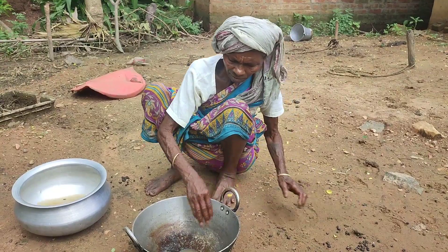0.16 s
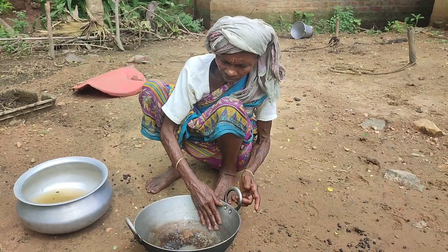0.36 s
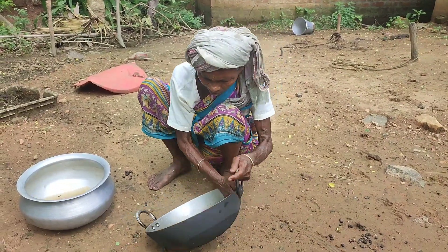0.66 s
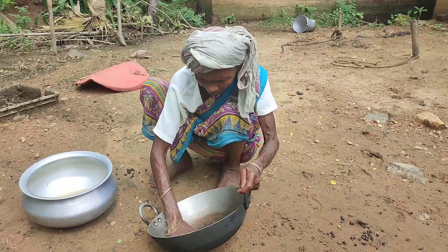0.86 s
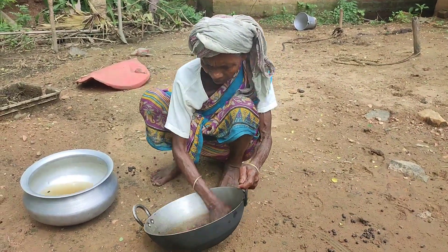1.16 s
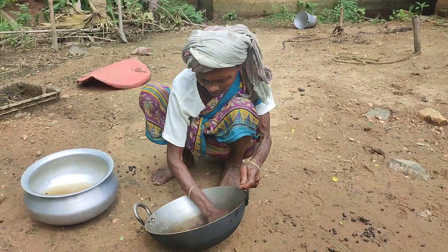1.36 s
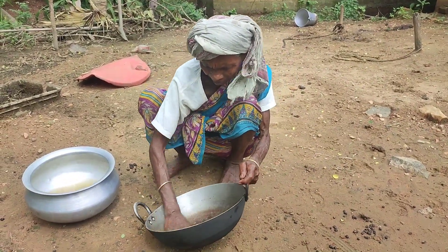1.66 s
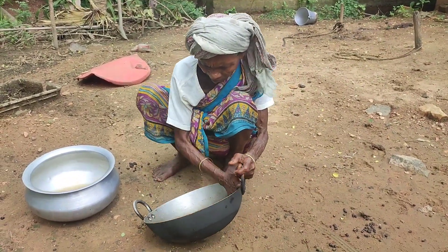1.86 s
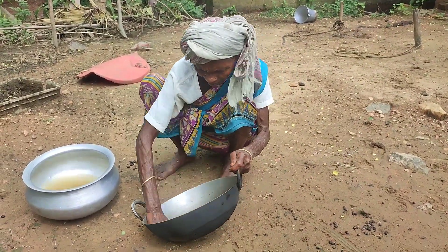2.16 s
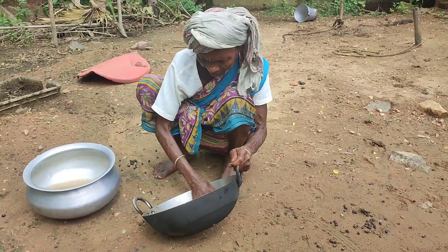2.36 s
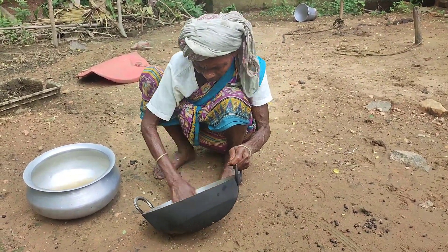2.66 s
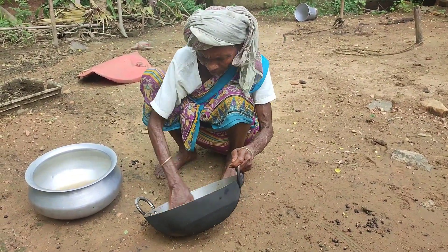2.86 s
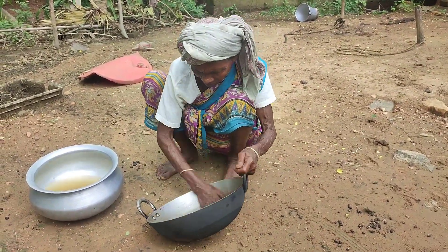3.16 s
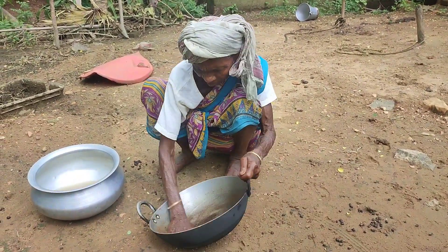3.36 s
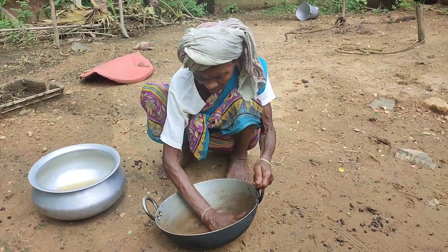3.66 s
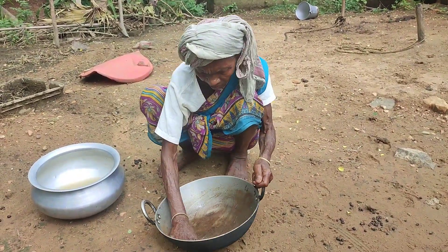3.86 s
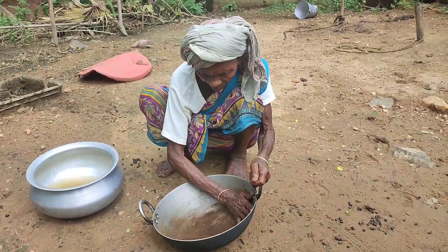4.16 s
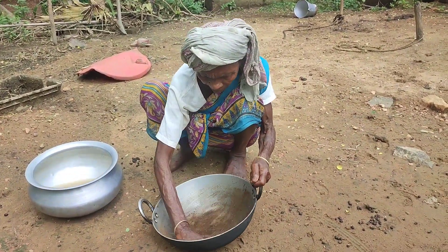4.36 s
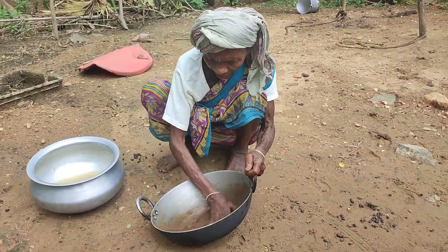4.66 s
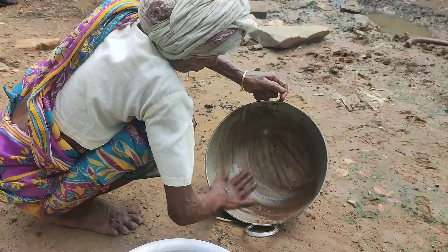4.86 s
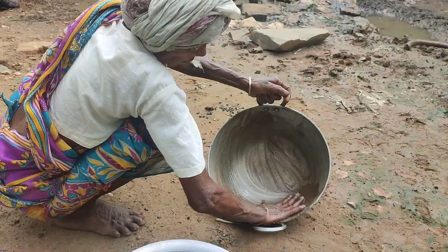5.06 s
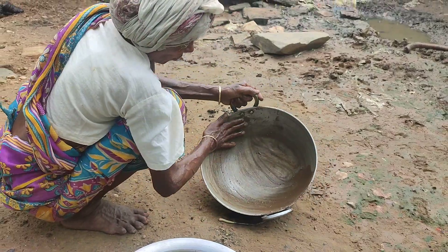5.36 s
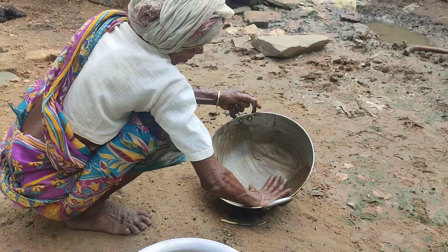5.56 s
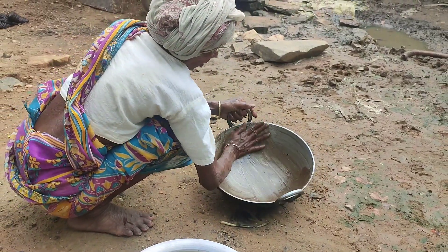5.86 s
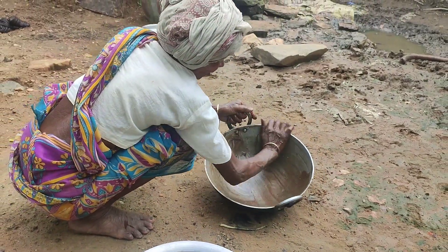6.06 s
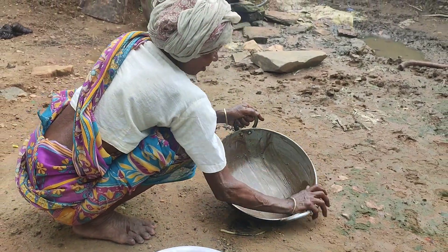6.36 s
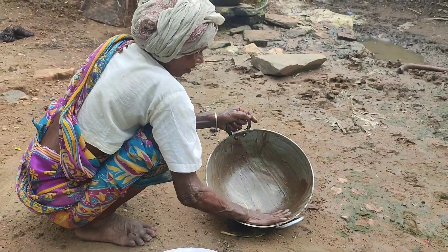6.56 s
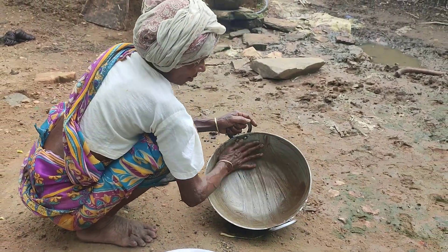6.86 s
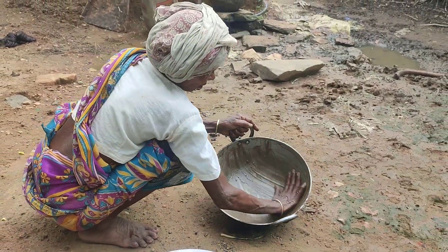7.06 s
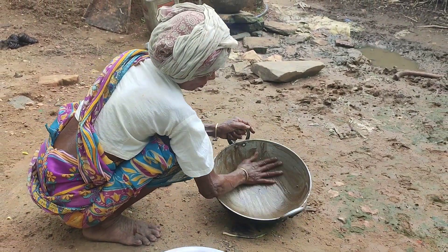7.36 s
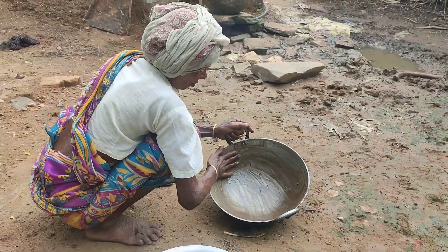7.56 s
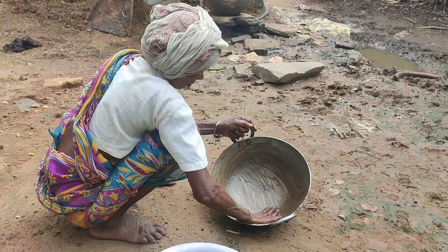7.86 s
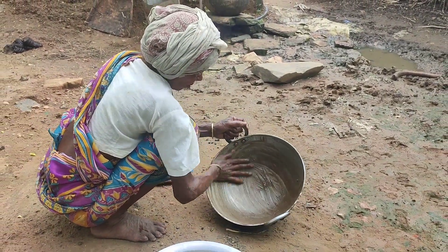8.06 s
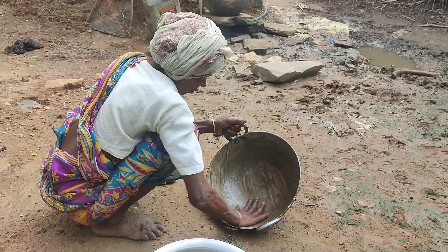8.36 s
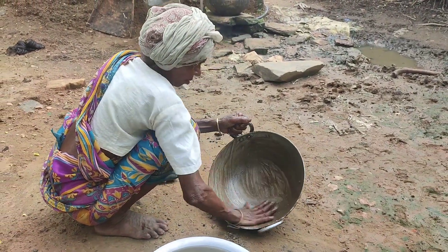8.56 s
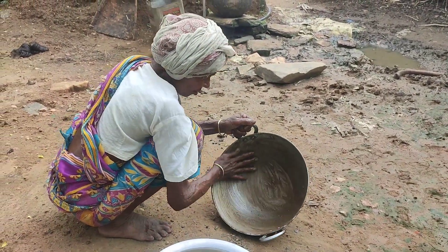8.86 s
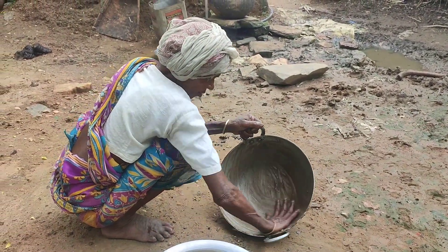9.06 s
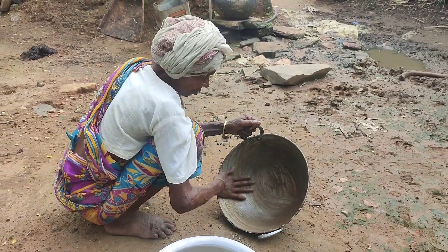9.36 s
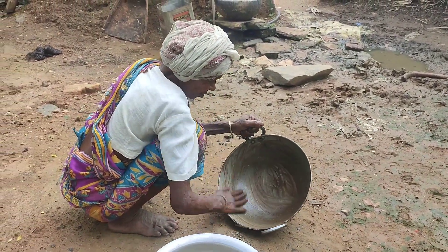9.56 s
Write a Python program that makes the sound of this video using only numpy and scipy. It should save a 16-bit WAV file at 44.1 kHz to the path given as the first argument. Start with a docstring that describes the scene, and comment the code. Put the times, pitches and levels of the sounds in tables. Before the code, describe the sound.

Gritty soil rasps round a metal bowl-shaped pan, about three strokes a second, with crunches, grinding drags and a few bumps on the microphone.

```python
"""A hand scours a metal pan with gritty soil in a yard, about three strokes a second. The grains catch
and slip as trains of clicks that ring the pan, with cracks, grinding drags, chattering grains and knocks.
It is heard from the front, then, after a short silence, from the side, where fingers bump, snap and press
the microphone housing (filtered noise and pulses). Behind are bird calls and a far engine, made of
wavering tones, and the open air, made of coloured noise."""
import sys
import numpy as np
from scipy import signal
from scipy.fft import rfft, irfft
from scipy.io import wavfile
from scipy.ndimage import uniform_filter1d, map_coordinates

SR = 44100
rng = np.random.default_rng(int(sys.argv[2]) if len(sys.argv) > 2 else 0)


def int16_out(signal):
    """Quantize to a 16-bit WAV file."""
    q = np.round(np.clip(np.atleast_2d(signal).T, -1, 1) * 32767)
    wavfile.write(sys.argv[1], SR, q.astype(np.int16))


N = 428211
TIME, HZ = np.arange(N) / SR, np.fft.rfftfreq(N, 1 / SR)


def amp(db):
    """Turns decibels into gain."""
    return 10 ** (np.asarray(db) / 20)


def unit(x):
    """Scales to rms 1."""
    return x / np.sqrt(np.mean(x ** 2) + 1e-20)


def read(points, hz):
    """Reads a spectrum table on a log-frequency axis."""
    f, value = np.transpose(points)
    return np.interp(np.log(hz + 1), np.log(f), value)


def follow(rows):
    """Turns each column of a curve table into one value a sample."""
    s, *columns = np.transpose(rows)
    return [np.interp(TIME, s, column) for column in columns]


def wander(per_s):
    """A smooth random curve of rms 1 that moves at rates up to about per_s."""
    return unit(irfft(rfft(rng.standard_normal(N)) / (1 + (HZ / per_s) ** 4), N))


def dying(t, t60):
    """Decay that starts at t = 0 and is 60 dB down after t60 seconds."""
    return (t >= 0) * np.exp(-np.log(1000) * np.maximum(t, 0) / t60)


def add(mix, s, sound):
    """Adds a stereo sound at time s."""
    part = mix[:, round(s * SR):][:, :sound.shape[1]]
    part += sound[:, :part.shape[1]]


def sides(balance_db):
    """Left and right gains whose mean is 1, for a given left minus right level."""
    pair = amp(np.array([balance_db, -balance_db]).reshape(2, -1) / 2)
    return pair / pair.mean(0)


def causal(gain):
    """Impulse response with this gain: a sharp start, then ringing (minimum phase)."""
    log_gain = np.log(np.maximum(gain, 1e-5))
    circle = np.concatenate([log_gain, log_gain[:, -2:0:-1]], axis=1)
    return np.fft.ifft(np.exp(np.conj(signal.hilbert(circle)))).real


# sweeps of the hand, heard from the front; levels are before the mix of soil grades:
# (start_s, length_s, fastest_point 0-1, rasp_db, sand_db re rasp, dust_db re rasp)
FRONT_STROKES = [(0.247, 0.39, 0.91, -51.5, -3.5, -9.5), (0.585, 0.42, 0.53, -50, -7, -10),
                 (0.893, 0.41, 0.74, -51, -5, -9.5), (1.299, 0.32, 0.34, -48.5, -8, -10.5),
                 (1.547, 0.38, 0.64, -47, -9.5, -9), (1.919, 0.33, 0.29, -48, -9.5, -7.5),
                 (2.232, 0.37, 0.3, -50.5, -7.5, -8), (2.517, 0.32, 0.37, -50.5, -8.5, -7),
                 (2.81, 0.3, 0.38, -52.5, -8, -6), (3.078, 0.39, 0.3, -50, -9, -10),
                 (3.354, 0.26, 0.58, -52, -6, -12), (3.595, 0.48, 0.29, -49.5, -10.5, -10),
                 (3.947, 0.28, 0.33, -46.5, -13.5, -15), (4.176, 0.44, 0.25, -50, -12.5, -10),
                 (4.414, 0.26, 1, -48.5, -7.5, -13.5)]
# relative colour of the rasp from the front: (pitch_hz, level_db per Hz)
FRONT_COLOUR = [(250, -34.5), (520, -16), (800, -25), (1400, -14.5), (2000, -18), (2800, -14.5),
                (4500, -14.5), (5800, -3.5), (6800, 2.5), (8300, -1), (9600, -3.5), (10900, -7.5),
                (12000, -4.5), (14000, -4.5)]
# left minus right from the front: (pitch_hz, balance_db)
FRONT_BALANCE = [(500, -1), (3000, 0), (5000, -2), (7000, -10), (8600, 3), (10300, -4.5), (12500, 4.5),
                 (14000, 2.5)]


def front_scouring():
    """Fresh, wet soil: a dense rasp with small flecks."""
    grains = grit(per_s=7000, spread_db=0.8, clump_db=1.0, clump_rate=13)
    grades_db = [-4.5, 1.5, -2.0, -0.2, 3.5]
    rasp = scour(grains, FRONT_STROKES, FRONT_COLOUR, FRONT_BALANCE, grades_db)
    return rasp + flecks(FRONT_STROKES, db=-20)


# sweeps of the hand, heard from the side; levels are before the mix of soil grades:
# (start_s, length_s, fastest_point 0-1, rasp_db, sand_db re rasp, dust_db re rasp)
SIDE_STROKES = [(4.815, 0.33, 0.41, -42, -5.5, -7.5), (5.111, 0.37, 0.61, -43.5, -5.5, -7.5),
                (5.462, 0.3, 0.24, -42, -3, -7.5), (5.659, 0.36, 0.83, -48, -6, -6),
                (5.919, 0.51, 0.9, -53, 0.5, -6.5), (6.385, 0.43, 0.39, -47.5, -5.5, -12),
                (6.667, 0.38, 0.48, -41.5, -16.5, -13.5), (7.033, 0.31, 0.16, -33.5, -20.5, -10.5),
                (7.277, 0.49, 0.1, -41.5, -14.5, -13.5), (7.54, 0.63, 0, -39.5, -11, -13),
                (7.981, 0.3, 0.46, -33.5, -12.5, -13), (8.226, 0.4, 0.52, -40, -10, -11.5),
                (8.596, 0.31, 0.66, -36, -12.5, -11.5), (8.9, 0.35, 0.4, -39.5, -7, -10.5),
                (9.22, 0.35, 0.67, -37.5, -13, -11), (9.539, 0.21, 0.78, -41, -12.5, -10.5)]
# relative colour of the rasp from the side: (pitch_hz, level_db per Hz)
SIDE_COLOUR = [(250, -26), (550, -26), (1050, -28.5), (1650, -16), (2350, -20), (3000, -13), (3900, -13),
               (5000, 0.5), (6400, 1), (7700, -12), (9300, -22.5), (10800, -28.5), (11500, -17.5),
               (14000, -14.5)]
# left minus right from the side: (pitch_hz, balance_db)
SIDE_BALANCE = [(800, -2.5), (1700, 2.5), (4300, 3.5), (5200, 5), (6400, 19.5), (7700, -1), (10000, -9),
                (13500, 5.5)]
# the rasp brightens; each grade of soil takes its own share of this: (time_s, brightness_db)
SIDE_BRIGHTNESS = [(6.5, 2), (7.0, 3.5), (9.7, 4.5)]


def side_scouring(lag_samples=2):
    """The flat palm presses harder, with the bowl open toward the microphone: louder and coarser."""
    grains = grit(per_s=5000, spread_db=-1.0, clump_db=1.05, clump_rate=30.0)
    grades_db = [-5.0, 1.43, -2.5, -3.0, 5.0]
    brightness_db = follow(SIDE_BRIGHTNESS)[0]
    rasp = scour(grains, SIDE_STROKES, SIDE_COLOUR, SIDE_BALANCE, grades_db, brightness_db)
    left, right = rasp + flecks(SIDE_STROKES, db=-13.5, low_hz=3320) * sides(2.4)
    return np.array([np.roll(left, lag_samples), right])  # the left port lies a little farther away


# coarse sand, fine sand, coarse grit, fine grit and dust lie between these: (edge_hz)
GRADE_EDGES_HZ = [250, 2400, 4000, 5600, 8500, 14400]
BRIGHTNESS_SHARE = [0.53, 0.12, -1.7, 1.0, -0.19]  # one a grade


def scour(grains, strokes, colour, balance, grades_db, brightness_db=0, shift_db=1.32, shift_per_s=30):
    """Each grade of soil excites its own range of the pan; their mix shifts as the soil rolls."""
    forces = np.sqrt(sweeps(strokes) ** 2 + bites() ** 2)
    hz, out = np.fft.rfftfreq(4096, 1 / SR) + 1, np.zeros((2, N))
    body = amp(read(colour, hz)) * pan_modes(hz) * sides(read(balance, hz))
    grades = zip(forces, cracks(), GRADE_EDGES_HZ, GRADE_EDGES_HZ[1:], grades_db, BRIGHTNESS_SHARE)
    for force, crush, low, high, db, share in grades:
        band = 1 / np.sqrt((1 + (low / hz) ** 16) * (1 + (hz / high) ** 16))
        response = causal(body * band)
        shift = shift_db * np.clip(wander(shift_per_s), -2, 1)
        rasp = grains * force * amp(share * brightness_db + shift)
        crushing = crush * rng.standard_normal((2, N))
        drive = amp(db) * (rasp * rng.choice([-1, 1], N) + crushing)
        out += signal.oaconvolve(drive, response / np.linalg.norm(response.mean(0)), axes=1)[:, :N]
    return wall_echo(bowl(out))


SPEED_POWER = 1.16  # the rasp grows with the speed of the hand to this power


def sweeps(strokes):
    """The hand speeds up and slows to a turn; gives the force on each grade of soil."""
    power = np.zeros((len(GRADE_EDGES_HZ) - 1, N))
    for start, length, fastest, db, sand_db, dust_db in strokes:
        now = (TIME > start) & (TIME < start + length)
        peak = np.clip(fastest, .05, .95)
        way = np.interp((TIME[now] - start) / length, [0, peak, 1], [0, .5, 1])
        force = amp(db) * abs(np.sin(np.pi * way)) ** SPEED_POWER
        power[:, now] += np.outer(amp([sand_db, sand_db, 0, 0, dust_db]), force) ** 2
    return np.sqrt(power)


# large grains cracking under the hand; levels are before the mix of soil grades:
# (time_s, level_db, decay_s to 60 dB down)
CRACKS = [(0.236, -49, 0.09), (1.363, -35.5, 0.06), (3.395, -44.5, 0.04), (4.811, -43, 0.1),
          (5.151, -37, 0.048), (5.499, -38.5, 0.05), (6.624, -38, 0.08), (6.743, -36, 0.047),
          (7.047, -36, 0.045), (7.330, -28, 0.034), (8.532, -28, 0.016)]
# share of a crack on each grade, coarse sand to dust: (level_db)
CRACK_GRADES_DB = [-14, -7, 0, 0, -11]


def cracks():
    """A large grain is crushed in a brief burst; gives its force on each grade of soil."""
    surge = sum(amp(db) * dying(TIME - s, t60) for s, db, t60 in CRACKS)
    return np.outer(amp(CRACK_GRADES_DB), surge)


# a hard grain is trapped under the palm and chatters along; levels are before the mix of soil grades:
# (start_s, length_s, level_db, dust_db re level)
BITES = [(1.493, 0.053, -47.5, -15), (3.496, 0.067, -50, -12), (4.546, 0.042, -45.5, -14),
         (5.527, 0.05, -34.5, -15), (6.615, 0.1, -44, -14.5), (7.059, 0.086, -32.5, -7),
         (7.598, 0.066, -27, -25), (8.045, 0.066, -29.5, -32), (9.019, 0.11, -33, -18)]
# share of a bite on coarse sand, fine sand, coarse grit, fine grit: (level_db re the bite)
BITE_GRADES_DB = [-23.5, -13.5, 2, -1]
BITE_EDGE_S = 0.0092  # how long the grain takes to grip or let go
CHATTER_DB, CHATTER_PER_S = 9, 150  # depth and mean rate of the chatter


def bites():
    """A trapped grain grips quickly, slips in a quick uneven train, then breaks free."""
    power = np.zeros((len(GRADE_EDGES_HZ) - 1, N))
    for s, length, db, dust_db in BITES:
        grip = np.clip(np.minimum(TIME - s, s + length - TIME) / BITE_EDGE_S, 0, 1)
        power += np.outer(amp([*BITE_GRADES_DB, dust_db]) ** 2, (amp(db) * grip) ** 2)
    slip_rate = CHATTER_PER_S * (1 + .5 * wander(CHATTER_PER_S))
    since_slip = np.cumsum(slip_rate) / SR % 1  # 0-1 from one slip to the next
    return np.sqrt(power) * unit(amp(-CHATTER_DB * since_slip))


def grit(per_s, spread_db, clump_db, clump_rate):
    """Grains catch and slip: clicks of unequal size, in clumps as the soil rolls under the hand."""
    spread = spread_db * np.minimum(rng.exponential(1, N), 5)
    clump = clump_db * np.minimum(wander(clump_rate), 1)
    clicks = amp(spread + clump) * (rng.random(N) < per_s / SR)
    return two_ports(unit(clicks * rng.choice([-1, 1], (2, N))))


# likeness of the two channels: (pitch_hz, likeness 0-1)
LIKENESS = [(100, 0.56), (700, 0.4), (1400, 1), (2100, 0.37), (3000, 0.89), (4800, 0.9), (6500, 0.26),
            (9000, 0), (14000, 0.33)]


def two_ports(pair):
    """Makes two unrelated signals partly alike, by a different amount at each pitch."""
    a, b = rfft(pair)
    same = np.clip(read(LIKENESS, HZ), 0, 1)
    return irfft(np.array([a, same * a + np.sqrt(1 - same ** 2) * b]), N)


# ringing of the pan over the rasp colour: (pitch_hz, width_hz, relative level_db)
PAN = [(544, 41, 6), (970, 120, 6.5), (1620, 190, 1), (2180, 130, 1), (2800, 140, 8.5), (3400, 50, 11.5),
       (4075, 250, 9.5), (4800, 150, 1), (5027, 59, 7.5), (5453, 70, 1), (5720, 74, 2), (6330, 60, -3),
       (6740, 250, -2.5), (7410, 220, 1.5)]


def pan_modes(hz, freedom_db=0, bend=0):
    """Gain of the pan's resonances over a flat ground; freedom_db raises or damps each, bend detunes it."""
    f, width, db = np.transpose(PAN)
    distance = 2 * (hz[:, None] - f * (1 + bend)) / width
    peaks = amp(db + freedom_db) ** 2 / (1 + distance ** 2) * 2
    return np.sqrt(1 + peaks.sum(1))


def bowl(x, echo=0.99, echo_t60=0.0069, ring_t60=0.096, laps_per_s=1.6, damping_db=2.0, count=8):
    """The hand passes spots of the bowl, each with its own reflections, faint ring and mix of modes."""
    t, out = np.arange(SR // 8) / SR, np.zeros((2, N))
    ring, hz = .7, np.fft.rfftfreq(2048, 1 / SR)
    place = count * laps_per_s * TIME + wander(1.69)
    for spot in range(count):
        away = abs((place - spot + count / 2) % count - count / 2)
        early, late = rng.standard_normal((2, len(t)))
        # soil and the holding hand damp the metal, so the ring stays below the direct click
        reflections = echo * unit(early * dying(t, echo_t60))
        ringing = ring * unit(late * dying(t, ring_t60))
        response = (reflections + ringing) / np.sqrt(len(t))
        response[0] = 1
        # the reflections ripple the colour but leave its broad outline alone
        outline = np.sqrt(uniform_filter1d(abs(rfft(response)) ** 2, size=200))
        outline = np.interp(hz, np.fft.rfftfreq(len(t), 1 / SR), outline)
        bend = .03 * rng.standard_normal(len(PAN))
        freedom_db = damping_db * (rng.standard_normal(len(PAN)) - damping_db / 10)
        modes = pan_modes(hz, freedom_db, bend) / pan_modes(hz)
        response = signal.fftconvolve(response, causal((modes / outline)[None])[0])
        near = np.cos(np.pi / 2 * np.minimum(away, 1))
        out += signal.oaconvolve(x * near, response[None], axes=1)[:, :N]
    return out


# reflection from the bowl's wall: its strength, its delay, and how far (a share of the delay)
# and how often the hand changes that delay
WALL_SHARE = 0.28
WALL_DELAY_S, WALL_SWING, WALL_MOVES_PER_S = 0.0013, 0.305, 3.83


def wall_echo(x):
    """The wall reflects each scrape over a path that changes as the hand moves: the colour keeps shifting."""
    delay = WALL_DELAY_S * (1 + WALL_SWING * np.tanh(wander(WALL_MOVES_PER_S)))
    echo = np.array([map_coordinates(side, [(TIME - delay) * SR], order=3) for side in x])
    return (x + WALL_SHARE * echo) / np.hypot(1, WALL_SHARE)


def flecks(strokes, db, per_s=260, spread_db=-1.5, t60=0.032, low_hz=2600, high_hz=7200, count=24):
    """Single hard grains skip over the metal, each with a tiny ping at one of a set of pitches."""
    t, out = np.arange(SR // 40) / SR, np.zeros((2, N))
    spread = amp(spread_db * np.minimum(rng.exponential(1, N), 4))
    skips = unit(spread * (rng.random(N) < per_s / SR))
    size = sweeps(strokes)[2] * skips
    kind = rng.integers(0, count, N)
    for k, hz in enumerate(np.geomspace(low_hz, high_hz, count)):
        ping = np.sin(2 * np.pi * (hz * t + rng.random((2, 1)))) * dying(t, t60)
        out += signal.oaconvolve((size * (kind == k))[None], ping / np.linalg.norm(ping[0]), axes=1)[:, :N]
    return amp(db) * out


# the hand drags and grinds with a rough pitch; levels are before the trim and the bowl:
# (middle_s, length_s, first_pitch_hz, last_pitch_hz, level_db)
DRAGS = [(0.387, 0.054, 2800, 2740, -59), (0.502, 0.1, 2670, 2950, -48.5), (1.217, 0.15, 1530, 1380, -57.5),
         (1.449, 0.15, 2840, 2800, -46), (1.738, 0.094, 1620, 1280, -61), (1.844, 0.1, 1390, 1530, -58),
         (2.02, 0.25, 1480, 1310, -55.5), (2.357, 0.14, 1700, 1580, -58.5), (2.66, 0.11, 1550, 1740, -64),
         (2.927, 0.094, 1680, 1640, -54), (3.21, 0.14, 1600, 1240, -58), (3.474, 0.1, 2850, 2750, -53),
         (3.73, 0.13, 2920, 2600, -52), (4.068, 0.13, 2800, 2920, -45.5), (4.66, 0.035, 3120, 2900, -47),
         (5.217, 0.24, 1540, 1730, -57), (5.367, 0.17, 1850, 2500, -53.5), (5.812, 0.25, 3530, 3100, -52),
         (6.324, 0.12, 2180, 2080, -58), (6.556, 0.097, 1910, 2080, -47), (6.853, 0.17, 3440, 2800, -47.5),
         (7.431, 0.1, 3000, 2880, -40), (7.62, 0.13, 1980, 2080, -45), (8.08, 0.14, 2800, 3020, -44),
         (8.415, 0.24, 1730, 1420, -54.5), (8.814, 0.097, 1600, 1670, -49), (9.08, 0.18, 1510, 1730, -49),
         (9.416, 0.1, 1620, 1770, -48)]


def drags(width_share=0.097, trim_db=-3, size=14000):
    """Soil judders under the fingers: grit rings one gliding resonance, broader when it starts higher."""
    grains, out = grit(per_s=2200, spread_db=-0.4, clump_db=3.5, clump_rate=35), np.zeros((2, N))
    t = np.arange(size) / SR
    for s, length, first_hz, last_hz, db in DRAGS:
        way = np.minimum(t / length, 1)
        smooth = signal.bessel(2, width_share * first_hz / 2, norm="mag", fs=SR)
        turn = np.exp(2j * np.pi * np.cumsum(first_hz + (last_hz - first_hz) * way) / SR)
        drive = np.take(grains, round(s * SR) + np.arange(size), axis=1, mode="wrap")
        # shift the gliding pitch down to zero, smooth there, shift back
        judder = (turn * signal.lfilter(*smooth, drive / turn)).real
        add(out, s - length / 2, amp(db + trim_db) * unit(judder) * np.sin(np.pi * way))
    return out


# the pan knocking on the ground: (time_s, level_db)
KNOCKS = [(1.365, -47.5), (2.861, -54), (3.397, -51), (8.531, -55)]


def knocks(t60=0.077, dull_hz=1700, size=4096):
    """The held pan rocks on the earth: a dull, damped clank."""
    t, hz, out = np.arange(size) / SR, np.fft.rfftfreq(size, 1 / SR), np.zeros((2, N))
    response = causal((pan_modes(hz) * hz / (hz + 200) / (1 + (hz / dull_hz) ** 2))[None])
    for s, db in KNOCKS:
        blow = rng.standard_normal((1, size)) * dying(t, t60)
        add(out, s, amp(db) * signal.fftconvolve(blow, response / np.linalg.norm(response)))
    return out


# fingers bumping the microphone housing:
# (time_s, level_db, centre_hz, decay_s to 60 dB down, left minus right balance_db)
BUMPS = [(5.094, -46.5, 397, 0.058, 40), (5.222, -46, 380, 0.05, 19), (5.38, -47.5, 254, 0.045, 24),
         (5.512, -52, 219, 0.17, 22), (5.851, -44, 298, 0.032, 23), (6.146, -26, 1420, 0.043, 29),
         (6.157, -32.5, 127, 0.17, 30), (6.165, -33, 925, 0.051, 16), (6.201, -36, 795, 0.023, 24),
         (6.504, -50, 298, 0.076, 25), (6.689, -42.5, 206, 0.068, 28)]


def bumps(crackle_db=4, size=8192):
    """Short, crackling rubs on the housing, from dull thuds to sharp ticks, mostly in the left port."""
    t, out = np.arange(size) / SR, np.zeros((2, N))
    for s, db, hz, t60, balance_db in BUMPS + fidgets():
        shape = dying(t, t60)
        crackle = np.repeat(rng.standard_normal(size), 32)[:size]
        slips = rng.standard_normal(size) * amp(crackle_db * crackle)
        rub = signal.lfilter(*signal.butter(1, [hz / 2, hz * 2], "band", fs=SR), slips * shape)
        rub = signal.lfilter(*signal.butter(2, min(7 * hz, 6000), fs=SR), rub)
        add(out, s, amp(db) * sides(balance_db) * rub * np.linalg.norm(shape) / np.linalg.norm(rub))
    return out


def fidgets(from_s=5.1, to_s=7.7, db=-54, spread_db=4.0, hz=220, t60=0.058, balance_db=21, count=12):
    """Faint, irregular taps of the fingers as they shift their grip; rows like those of BUMPS."""
    rows = []
    for _ in range(count):
        s, level_db = rng.uniform(from_s, to_s), db + spread_db * rng.standard_normal()
        rows.append((s, level_db, hz * 2 ** rng.uniform(-1, 1), t60, balance_db))
    return rows


# sharp snaps of the housing under the fingers: (time_s, level_db before the low-pass, width_s)
SNAPS = [(5.0953, -20.5, 0.00011), (5.858, -52, 0.00044), (6.1456, -13, 0.000078), (6.1483, -4, 0.000082),
         (6.1555, -24, 0.000068), (6.1562, -21, 0.00018), (6.1877, -18, 0.000093), (6.194, -21, 0.000088),
         (6.2, -24, 0.00033)]


def snaps(top_hz=6000, balance_db=22, ring_hz=1150, ring=0.077, ring_t60=0.007, size=1024):
    """The housing snaps: single pulses, the shorter the brighter, each with a brief hollow ring."""
    t, out = np.arange(size) / SR, np.zeros((2, N))
    for s, db, width in SNAPS:
        click = np.gradient(t * np.exp(-t / width)) * SR
        pulse = click + ring * np.sin(2 * np.pi * ring_hz * t) * dying(t, ring_t60)
        add(out, s, amp(db) * sides(balance_db) * signal.lfilter(*signal.butter(3, top_hz, fs=SR), pulse))
    return out


# the hardest bump also presses on the housing; the level scales both halves of the pulse
THUMP_S, THUMP_DB, THUMP_WIDTH_S, THUMP_BALANCE_DB = 6.1683, -18, 0.0027, 25
THUMP_REBOUND = 2.3  # the housing springs back this much more slowly


def thump():
    """A low thump: the housing is pressed in and springs back."""
    u = (TIME - THUMP_S) / THUMP_WIDTH_S
    press = np.exp(-u ** 2 / 2)
    rebound = np.exp(-(u / THUMP_REBOUND) ** 2 / 2) / THUMP_REBOUND
    return amp(THUMP_DB) * sides(THUMP_BALANCE_DB) * (rebound - press)


# far bird, one table a call; pitch and level waver around these: (time_s, pitch_hz, level_db)
BIRD = [
    [(3.7, 686, -80), (3.87, 712, -67), (4.12, 700, -88), (4.42, 680, -70.5), (4.55, 655, -76)],
    [(8.87, 625, -72), (9.08, 710, -70), (9.19, 850, -63), (9.3, 720, -77), (9.41, 760, -61),
     (9.5, 735, -76)],
]


def bird(hoarse=0.028, flutter_db=2.5):
    """Long, thin calls from far away: gliding tones whose wavering pitch makes them slightly hoarse."""
    out = np.zeros(N)
    for call in BIRD:
        hz, db = follow(call)
        turns = np.cumsum(hz * (1 + hoarse * wander(99.0))) / SR
        sounding = uniform_filter1d(1. * (TIME > call[0][0]) * (TIME < call[-1][0]), size=1500)
        out += sounding * amp(db + flutter_db * wander(33)) * unit(np.sin(2 * np.pi * turns))
    return out


ENGINE_HZ = 42.5  # mean firing rate
# far engine; levels waver around these: (multiple of firing rate, front level_db, side level_db)
ENGINE = [(2, -64.5, -71), (3, -63, -68.5)]


def engine(column, waver_db=2, drift=0.00389):
    """Only the low firing harmonics of the far engine arrive, wavering on the way."""
    turns, out = np.cumsum(ENGINE_HZ * (1 + drift * wander(0.84))) / SR, np.zeros(N)
    for row in ENGINE:
        tone = unit(np.sin(2 * np.pi * round(row[0]) * turns))
        out += amp(row[column] + waver_db * wander(0.99)) * tone
    return out


# relative colour of the air of the yard: (pitch_hz, level_db per Hz)
AIR = [(20, 4), (40, -4.5), (60, -5.5), (110, -9.5), (200, -18.5), (400, -25), (900, -30.5), (2000, -37),
       (14000, -41.5)]


def yard(air_db, balance_db):
    """Low rumble and faint hiss of open air: steady coloured noise."""
    air = irfft(rfft(two_ports(rng.standard_normal((2, N)))) * amp(read(AIR, HZ)), N)
    return amp(air_db) * sides(balance_db) * unit(air)


def during(span):
    """Opens and shuts within a few milliseconds."""
    return uniform_filter1d(1. * (TIME > span[0]) * (TIME < span[1]), size=200)


# when each listening position is heard: (start_s, end_s)
FRONT_SPAN = (-.1, 4.682)
SIDE_SPAN = (4.809, 9.9)


def scene():
    """The two listening positions, one after the other."""
    grinding = bowl(drags(), echo=0.21)
    shared = knocks() + bumps() + snaps() + thump() + bird()
    front = front_scouring() + grinding
    front = front + engine(column=1) + yard(air_db=-54.0, balance_db=0.5)
    side = side_scouring() + grinding * sides(6.6)
    side = side + engine(column=2) * sides(0.67) + yard(air_db=-54.5, balance_db=2.0)
    return during(FRONT_SPAN) * (front + shared) + during(SIDE_SPAN) * (side + shared)


EDGE_HZ = 14550  # top of the recorder's band


def record(dry):
    """The recorder's band limit: a steep low-pass."""
    low_pass = signal.firwin(401, EDGE_HZ, window=("kaiser", 8), fs=SR)
    return signal.oaconvolve(dry, low_pass[None], "same")


dry = scene()
out = record(dry)
int16_out(out)
```